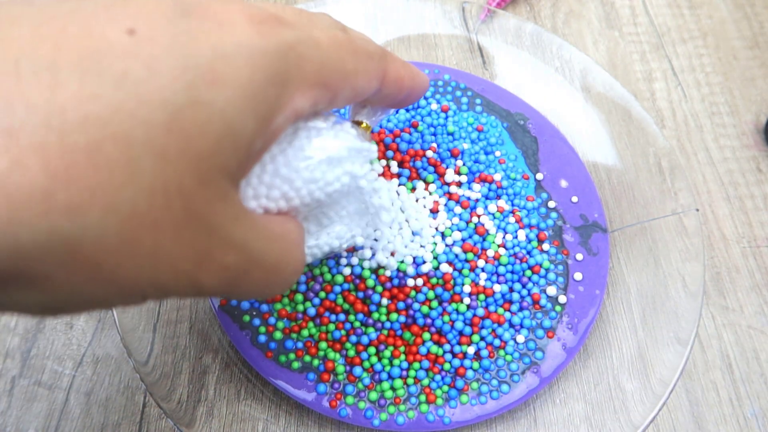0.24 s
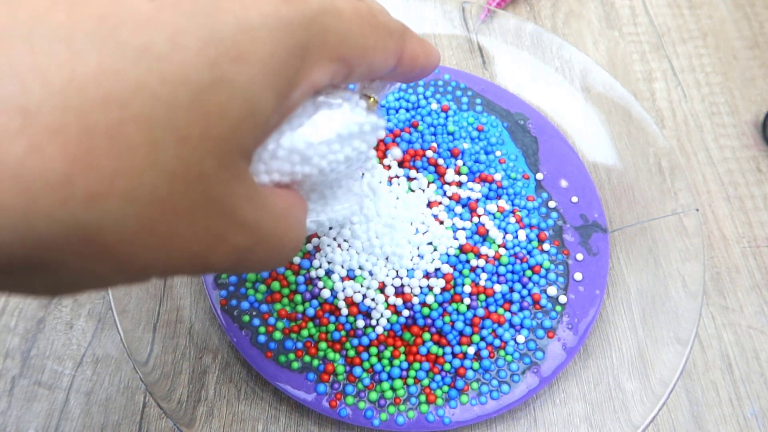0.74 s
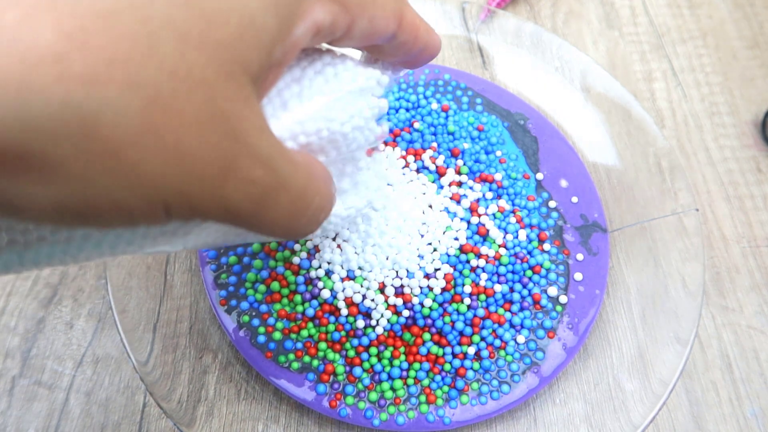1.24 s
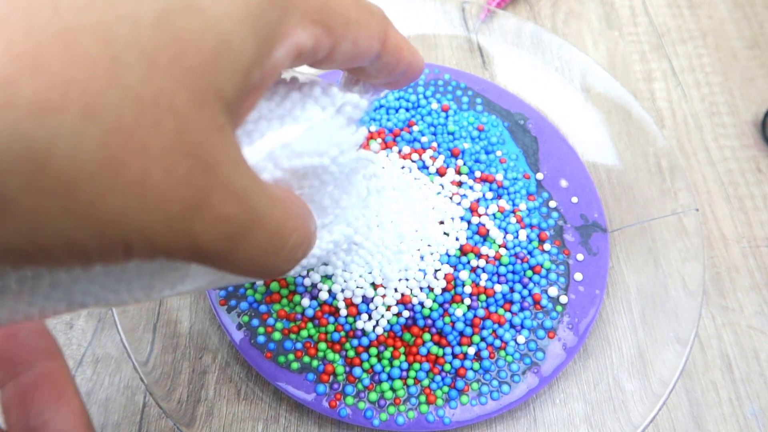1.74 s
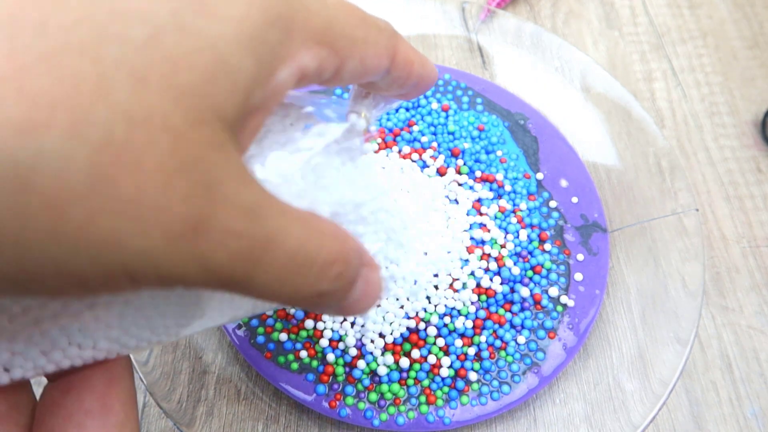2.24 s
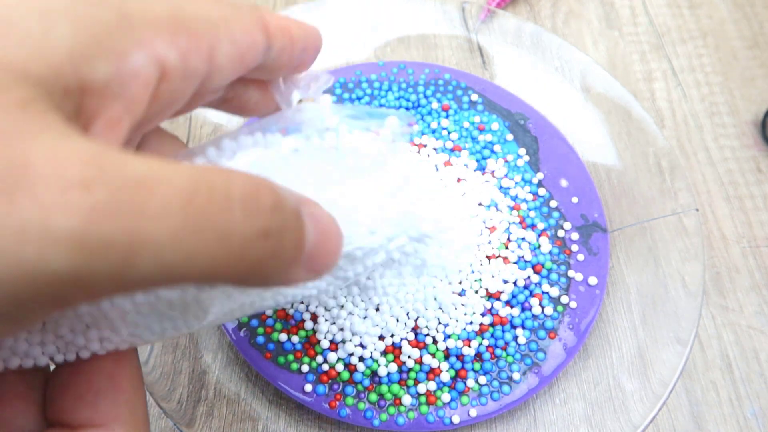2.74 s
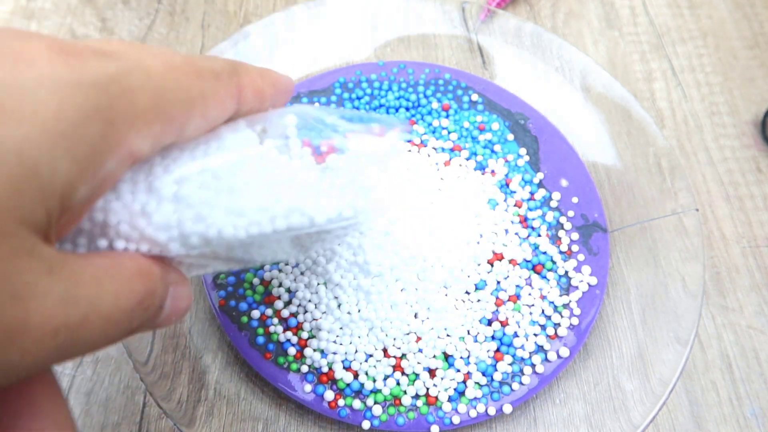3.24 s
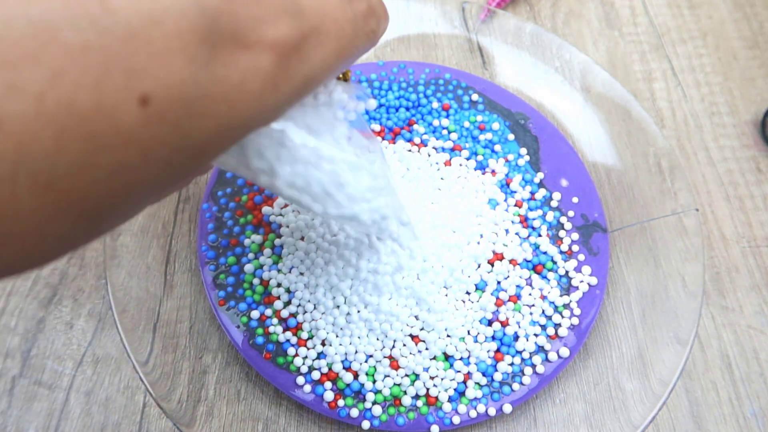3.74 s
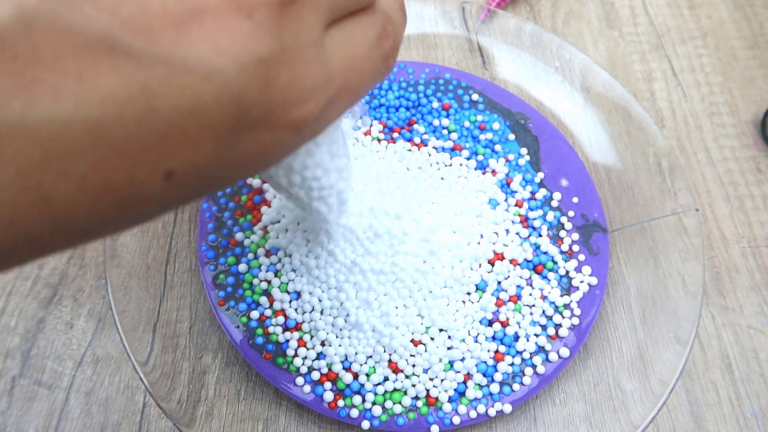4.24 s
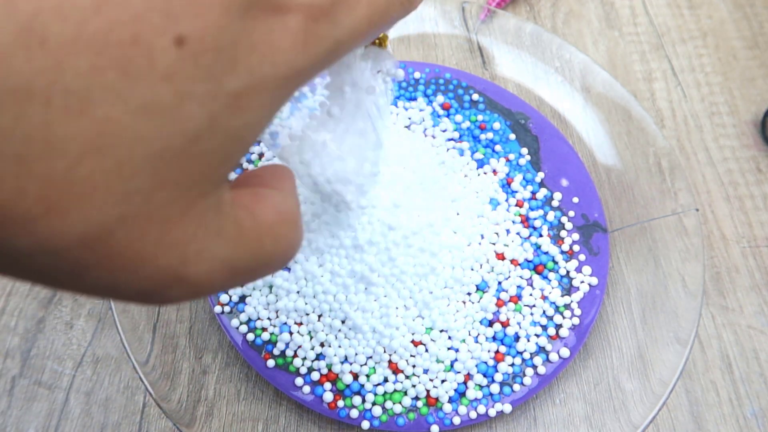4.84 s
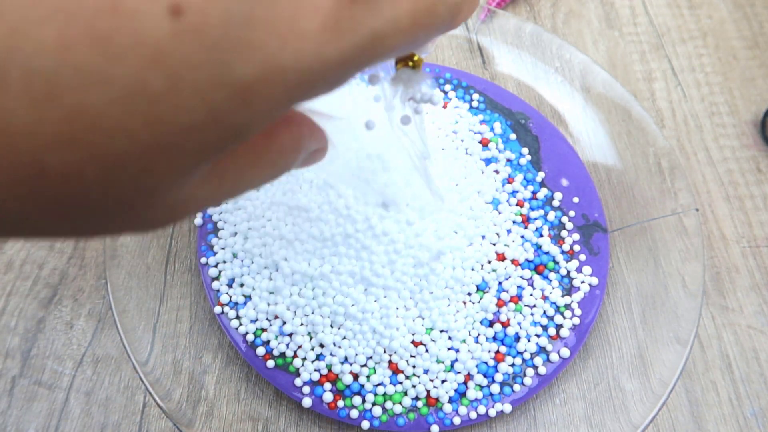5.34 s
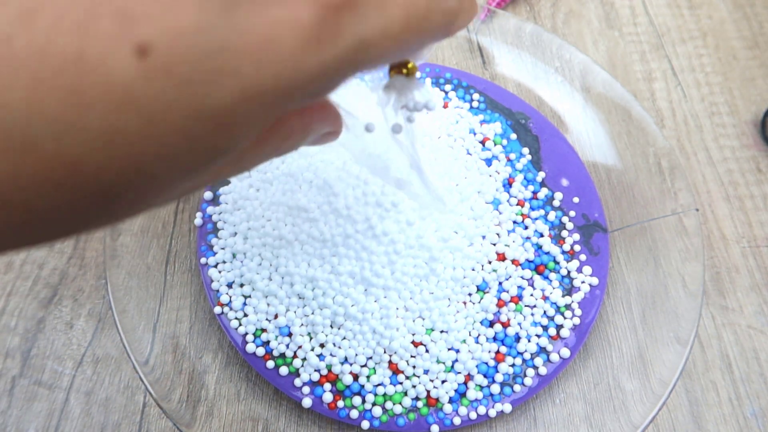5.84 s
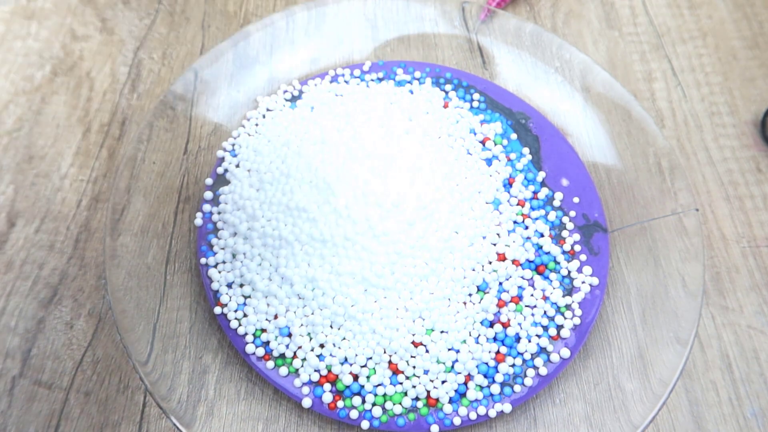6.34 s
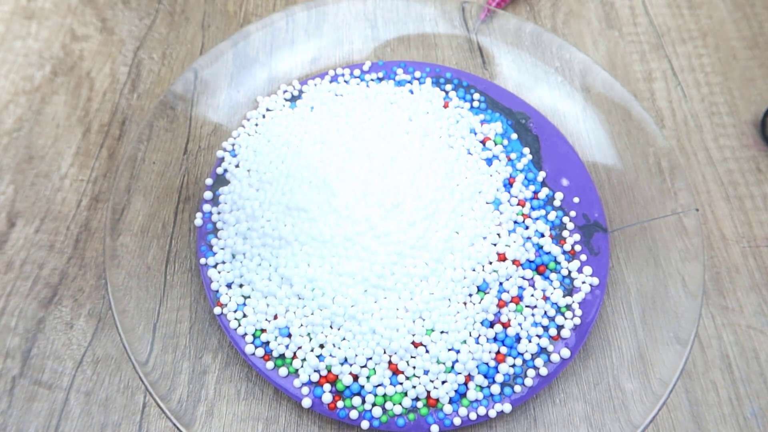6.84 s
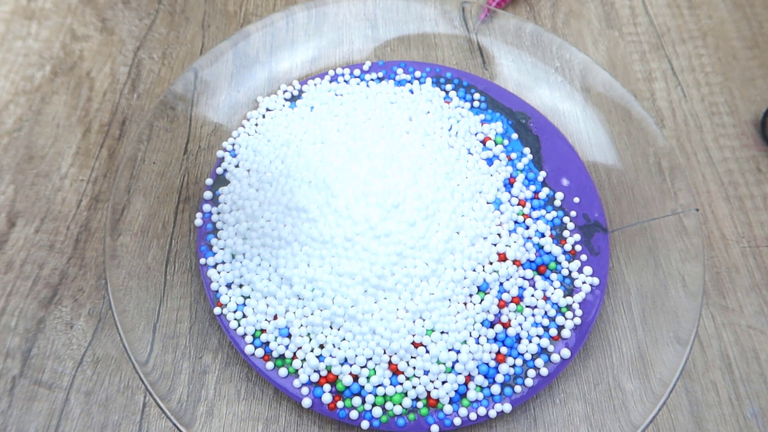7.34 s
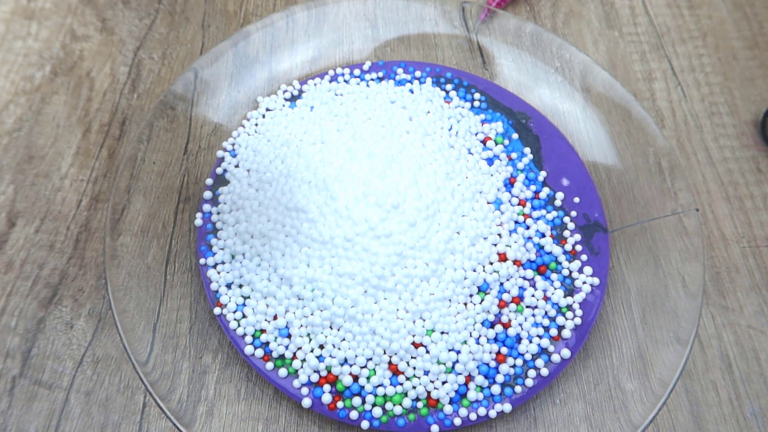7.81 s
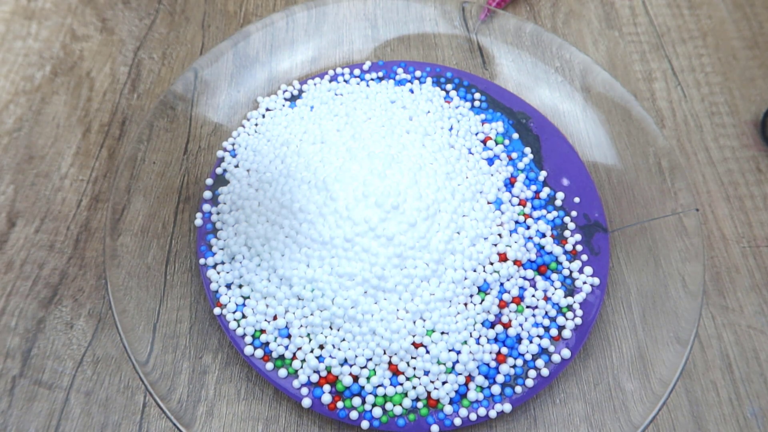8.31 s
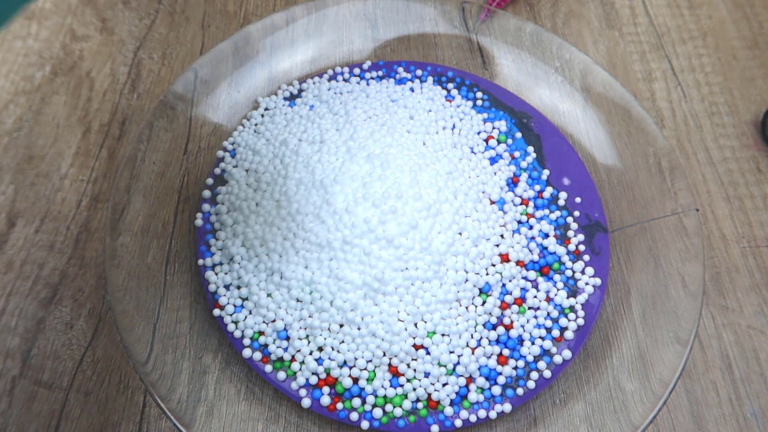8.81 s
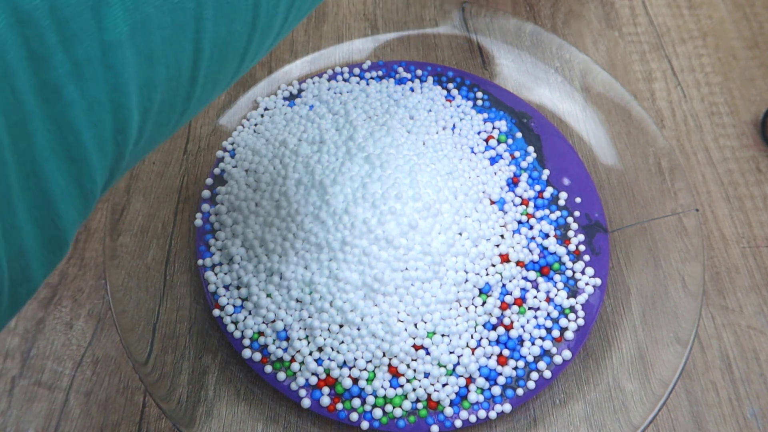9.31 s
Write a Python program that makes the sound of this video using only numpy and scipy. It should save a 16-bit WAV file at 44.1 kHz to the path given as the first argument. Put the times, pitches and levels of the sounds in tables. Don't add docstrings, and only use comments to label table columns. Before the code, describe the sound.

Thin plastic film rustles and pops close up after two distorted early thumps, fading into near-quiet before a stiffer bag crackles crisply at the end.

```python
import sys
import numpy as np
from scipy import signal
from scipy.fft import rfft, irfft, next_fast_len
from scipy.io import wavfile
from scipy.ndimage import uniform_filter1d

SR = 44100
rng = np.random.default_rng(int(sys.argv[2]) if len(sys.argv) > 2 else 0)


def level_to_linear(level):
    exponent = np.asarray(level, float) / 20
    return 10 ** exponent


def unload_wav(signal):
    wavfile.write(
        sys.argv[1],
        SR,
        np.round(np.clip(np.atleast_2d(signal).T, -1, 1) * 32767).astype(np.int16),
    )


N = 422037
T = np.arange(N) / SR
SLOW = T[::64]

# pitch_hz, level_db (per Hz)
FILM_TONE = [(180, -50), (300, -14), (366, -8.5), (725, -6), (1150, -8.5), (1360, -7), (1690, -4.5),
             (2400, -8), (4300, -4), (5340, -7.5), (6100, -14), (9880, -18.5), (15000, -35.5), (16000, -43)]
# pitch_hz, level_db (per Hz)
STIFF_TONE = [(2000, -30), (4000, -8), (5500, 0), (7000, -5), (10000, -9), (13000, -11), (15500, -15),
              (17000, -40)]
# pitch_hz, level_db (per Hz)
ROOM_TONE = [(15, -27.5), (25, 6), (58, 1.5), (146, -10.5), (313, -11.5), (422, -16), (854, -18.5),
             (1030, -19.5), (1250, -23), (1880, -29), (2460, -30), (12900, -34.5), (14400, -32),
             (15600, -33), (16500, -40)]
# pitch_hz, level_db, wander_hz
HUM = [
    (50, -60.5, 3.3),
    (100.7, -69, 7.65),
]
# start_s, peak_db, swing_hz, length_s, ring_share_db
BUMPS = [(.2120, -9, 240, .012, -14), (.2111, -15, 1000, .012, -30), (.2170, -11, 1150, .004, -30),
         (.2173, 3, 330, .0075, -36), (.2263, -12, 240, .015, -36), (.2981, -23, 250, .012, -30),
         (.3051, -1, 300, .0085, -18), (.3150, -11, 230, .010, -34), (.413, -31, 312, .04, -25),
         (.443, -22, 312, .035, -25), (.465, -23, 420, .035, -20), (.518, -35, 150, .04, -20),
         (.559, -25, 400, .04, -25), (.594, -26, 436, .03, -25), (3.383, -37, 140, .03, -40),
         (3.426, -38, 130, .03, -40), (5.660, -35, 90, .03, -40), (5.697, -32, 70, .04, -40),
         (6.919, -35, 150, .03, -40), (7.4825, -35, 150, .07, -6), (7.5292, -14, 300, .012, -12),
         (7.5328, -7.5, 290, .012, -9), (7.541, -19, 345, .06, -30), (7.609, -14, 380, .010, -12),
         (7.62, -33, 150, .06, -30), (7.640, -29, 400, .03, -12), (7.7375, -10, 320, .028, -13),
         (9.327, -34, 170, .03, -30), (2.337, -30, 390, .015, -30), (2.42, -36, 340, .015, -30),
         (3.097, -37, 310, .015, -30), (3.5105, -27, 650, .008, -30), (3.707, -34, 300, .01, -30),
         (3.784, -36, 200, .012, -30), (3.864, -31, 450, .01, -30), (3.918, -28, 380, .01, -30),
         (4.026, -34, 220, .012, -30), (4.269, -25, 420, .01, -30), (5.171, -34, 180, .015, -30),
         (5.399, -35, 350, .012, -30),]
# pitch_hz, level_db, fade_60db_s
STAND_MODES = [(146, -1, 0.069), (344, -4, 0.099), (492, 4, 0.045), (620, -4, 0.03), (880, 0, 0.04),
               (934, -14.5, 0.14), (1350, -10, .015), (2040, -6, 0.021), (6630, -12.5, 0.022)]
# peak_s, main_mode_db, judder_db, fall_10db_s
PUSHES = [
    (.41, -56, -34, .06),
    (.46, -52, -30, .07),
    (.59, -48, -36, .17),
    (.68, -44, -55, .03),
    (.89, -42, -48, .06),
    (.97, -43, -56, .05),
    (1.6, -52, -48, .3),
    (7.59, -41, -46, .04),
    (7.67, -43, -46, .04),
]
# start_s, jump (1 = full scale), chatter_ms before settling
SLAMS = [(.2089, -2.4, .4), (.2098, 3.3, .25), (.2108, -.6, .05), (.2774, 1.6, .4), (.2787, -1.7, .05),
         (.2796, .95, .05), (.2828, -.9, .05), (.2840, .9, .05), (.2868, -.75, .3), (.2872, .85, .03),
         (.2874, -.85, .03), (.2887, .95, .25), (.2890, -.9, .03), (.2192, .08, .03), (.3053, -.12, .03)]
# start_s, lowest_gain_db, hold_s
DUCKS = [
    (.209, -28, .001),
    (.277, -35, .04),
]
# start_s, rustle_db, treble_share_db
GRIP = [(0, -52, -12), (.06, -45, -17), (.2, -43, -13), (.55, -50, -11), (.93, -54, -8), (1.15, -47, -9),
        (1.85, -50, -5), (2.6, -46, -5), (3.45, -45, -12), (4.1, -44, -12), (4.9, -45, -8), (5.2, -51, -3),
        (5.45, -61, -9), (6.2, -63, -8), (7.5, -67, -8), (9.1, -66, -7), (9.3, -60, -12), (9.57, -46, -5)]
# peak_s, level_db, rise_10db_s, fall_10db_s, treble_share_db
POURING = [(.45, -39, .015, .065, -15), (.71, -47, .03, .1, -14), (.83, -45, .03, .04, -11),
           (1.03, -46, .06, .3, -14), (1.62, -46, .08, .08, -12), (1.78, -48, .4, .08, -12),
           (2.01, -38, .12, .1, -11), (2.25, -36, .08, .2, -15), (2.51, -34, .1, .06, -11.5),
           (2.7, -42, .08, .08, -12), (2.86, -39, .1, .11, -12.5), (3.12, -41, .2, .02, -13),
           (3.19, -40, .03, .15, -18), (3.28, -37, .1, .06, -8), (3.39, -37, .01, .04, -17),
           (3.8, -33, .1, .25, -13.5), (3.93, -33, .06, .06, -15), (4.28, -31.5, .08, .26, -13.5),
           (4.51, -29, .07, .09, -13), (4.75, -30.5, .08, .11, -11.5), (4.89, -38, .02, .03, -19),
           (4.97, -38, .07, .2, -14)]
# peak_s, level_db, rise_10db_s, fall_10db_s, treble_share_db
HANDLING = [(5.4, -48, .02, .02, -28), (5.66, -49, .04, .2, -16), (6.57, -48, .12, .2, -9),
            (6.8, -56, .1, .08, -3), (6.93, -43, .015, .1, -24), (7.02, -45, .06, .08, -8),
            (7.26, -45.5, .07, .07, -10), (8.07, -54, .008, .05, -20), (8.4, -58, .25, .15, -8),
            (8.58, -47, .006, .06, -34), (9.17, -44, .005, .05, -9), (9.215, -41, .01, .02, -14),
            (9.335, -34, .005, .03, -2.5), (9.39, -30.5, .03, .07, -4), (9.57, -38, .12, .1, -7)]
# start_s, peak_db, ring_hz, treble_share_db
PINGS = [(2.2044, -31, 1620, -26), (3.1672, -28, 1600, -21), (3.1983, -18, 1640, -13.5),
         (3.2354, -24, 1750, -17), (3.384, -16.5, 1440, -14), (3.4266, -19.5, 1740, -30),
         (3.9185, -12.5, 1600, -18.5), (3.9304, -15, 2140, -28), (3.9554, -22, 1680, -16),
         (4.0273, -17, 1690, -40), (4.0846, -23.5, 1570, -19), (4.5078, -9.5, 1760, -14.5),
         (4.5714, -18.5, 1440, -30), (4.58, -14.5, 1600, -30), (4.6678, -29, 1550, -27),
         (4.8831, -16.5, 1280, -30), (5.0614, -23, 1540, -28), (5.2978, -35, 1470, -30),
         (5.62, -24, 1580, -58), (5.8601, -34, 1830, -8), (6.2861, -39, 1860, -28),
         (7.0663, -33, 1040, -22), (7.2592, -22, 1480, -13), (7.3063, -23.5, 1520, -16)]
# start_s, peak_db, ring_hz, treble_share_db
SNAPS = [(.6973, -34, 4250, -20), (.826, -21, 4450, -12), (1.9749, -26, 4250, -13),
         (2.0213, -25, 3850, -20), (2.4194, -23.5, 4340, -24), (2.4877, -14, 3500, -16.5),
         (3.0011, -28, 2780, -25), (3.2675, -14, 4500, -19), (3.3194, -28, 4790, -4),
         (3.7843, -15, 3430, -19), (3.7904, -20, 3350, -18), (3.8654, -20, 4130, -21),
         (4.5334, -19, 3640, -30), (4.6838, -25.5, 3960, -33), (4.7306, -31, 4050, -29),
         (5.1352, -37, 3660, -4), (5.1711, -12, 3750, -20), (5.4745, -37, 4700, -30),
         (5.8414, -38, 5500, -10), (5.8187, -23, 5700, -15.5), (6.7765, -41, 4450, -9),
         (7.1471, -33, 3870, -19), (7.195, -35, 3320, -14)]
# start_s, peak_db, ring_hz, treble_share_db
THUDS = [(.5711, -36.5, 1520, -22), (.9278, -40, 1450, -11), (2.3376, -25, 1270, -17),
         (3.512, -22, 1770, -30), (3.5765, -31, 900, -40), (4.2684, -23, 1730, -26),
         (4.2737, -33, 1780, -27), (5.2245, -34, 1420, -20), (5.3996, -28, 1290, -50),
         (5.4717, -31.5, 1450, -18), (5.5123, -40, 3590, -17), (5.7643, -39, 1510, -25),
         (5.9209, -38, 1600, -23), (6.8897, -34, 1020, -47), (6.9206, -25, 1000, -25),
         (6.9655, -35, 3240, -19)]
# start_s, peak_db, ring_hz, treble_share_db
NEXT_BAG = [
    (8.1972, -42.5, 2130, .5),
    (8.4271, -40.5, 3040, -2.5),
    (9.166, -28, 1840, -9.5),
    (9.4044, -18, 1640, -20),
    (9.4987, -27.5, 4530, -19),
    (9.5192, -30, 1740, -17),
    (9.5486, -25.5, 1840, -11),
]
# body_share_db, tail_ms
CREASE_KINDS = [
    (-26, 5.3),
    (-25, 5.5),
    (-12, 5.5),
    (-23, 9.5),
]
# start_s, peak_db, length_ms, centre_hz, treble_share_db
RUNS = [(.074, -30, 4, 1700, -20), (.14, -33, 25, 1400, -20), (.177, -31, 8, 1700, -14),
        (2.2366, -27, 8, 4380, -18), (2.2485, -25, 8, 4400, -18), (2.4556, -31, 8, 3600, -10),
        (2.5668, -27, 6, 4580, -15), (3.0981, -20, 12, 4300, -18), (3.281, -21, 8, 4400, -14),
        (3.512, -22, 3, 4100, -22), (3.5591, -36, 5, 2300, -11), (3.6547, -36, 6, 1570, -17),
        (3.6782, -33, 6, 2550, -15), (4.2479, -23, 8, 4280, -18), (4.2737, -15, 5, 1900, -15),
        (4.38, -22, 15, 3600, -18), (4.487, -25, 8, 4300, -22), (5.0056, -32, 6, 1270, -15),
        (5.36, -33, 8, 4000, -15), (5.3996, -37, 5, 2100, -30), (6.921, -20, 5, 900, -17),
        (6.934, -26, 14, 700, -25), (6.982, -28, 8, 3600, -12), (7.0149, -29, 10, 3900, -13),
        (7.0324, -27, 9, 4300, -15), (7.0833, -33, 5, 4300, -10), (7.1531, -32, 3, 4270, -22),
        (7.2, -36, 4, 3300, -10), (7.2345, -28, 6, 1200, -14), (8.0626, -38, 14, 3200, -16),
        (8.5739, -28, 8, 2200, -25), (8.585, -32, 25, 500, -30), (9.1885, -25, 10, 4900, -8),
        (9.2109, -21, 8, 1700, -9), (9.238, -36, 8, 5000, -10), (9.2733, -36, 8, 5000, -10),
        (9.327, -24, 6, 1500, -8), (9.331, -16, 14, 5600, -8), (9.44, -30, 6, 4500, -8),
        (9.529, -36, 3, 1800, 3),
        (2.489, -23, 18, 4600, -12), (3.385, -22, 5, 3800, -12), (3.427, -26, 4, 3000, -18),
             (9.211, -25, 6, 5500, -3), (3.7845, -22, 5, 4200, -14), (.306, 8, 3, 1200, -30),
             (9.415, -20, 8, 5500, -8), (9.365, -24, 10, 5800, -8), (3.785, -20, 6, 1700, -20),
             (3.919, -19, 4, 2600, -20), (4.027, -27, 3, 3500, -25), (4.58, -22, 3, 4100, -22),
             (4.884, -25, 5, 3700, -22), (5.172, -24, 3, 5200, -6), (7.2355, -31, 6, 4300, -14),
             (7.26, -27, 6, 1500, -14)]


def unit(x):
    return x / np.sqrt(np.mean(x ** 2))


def peak(x):
    return x / np.abs(x).max()


def colour(x, points, lo_hz=8.4, hi_hz=30300.0):
    size = next_fast_len(len(x))
    hz = np.maximum(np.fft.rfftfreq(size, 1 / SR), 1)
    points_hz, points_db = np.array(points).T
    db = np.interp(np.log(hz), np.log(points_hz), points_db)
    skirts = 1 / np.sqrt((1 + (lo_hz / hz) ** 8) * (1 + (hz / hi_hz) ** 8))
    return irfft(rfft(x, size) * level_to_linear(db) * skirts, size)[:len(x)]


def walk(rate_hz):
    k = int(SR / rate_hz)
    steps = np.repeat(rng.standard_normal(N // k + 1), k)
    return unit(uniform_filter1d(uniform_filter1d(steps, k), k)[:N])


def ring(x, hz, t60):
    p, w = np.exp(-np.log(1000) / (t60 * SR)), 2 * np.pi * hz / SR
    return signal.lfilter([0, p * np.sin(w)], [1, -2 * p * np.cos(w), p * p], x)


def add(out, s, x):
    i = int(s * SR)
    out[i:i + len(x)] += x[:len(out) - i]


def swell(s, peak_s, rise_s, fall_s):
    roundness = 1.5
    return -10 * np.where(s < peak_s, (peak_s - s) / rise_s, (s - peak_s) / fall_s) ** roundness


def room():
    out = level_to_linear(-59 + .5 * walk(3.28)) * unit(colour(rng.standard_normal(N), ROOM_TONE, 95., 19000.0))
    out += level_to_linear(-74.) * unit(colour(rng.standard_normal(N), ROOM_TONE, 28., 45.))
    out += level_to_linear(-80.) * unit(ring(rng.standard_normal(N), 14850., .012))
    for hz, db, wander_hz in HUM:
        turns = np.cumsum(hz + wander_hz * walk(25)) / SR
        out += np.sqrt(2) * level_to_linear(db + 1.2 * walk(9)) * np.sin(2 * np.pi * turns)
    return out


def gain_db(s):
    rest_db, attack_s, recover_db_per_s = 8.5, .009, 420.
    db = rest_db + 0 * s
    for start, low_db, hold in DUCKS:
        since = s - start - attack_s
        falling = -since / attack_s * (rest_db - low_db)
        recovering = np.maximum(since - hold, 0) * recover_db_per_s
        db = np.minimum(db, low_db + np.maximum(falling, recovering))
    return db


def bumps():
    out, blows, t = np.zeros(N), np.zeros(N), T[:SR // 4]
    for s, db, hz, t60, ring_db in BUMPS:
        size = level_to_linear(db - gain_db(s + 0.0023))
        build_up = (1 - np.exp(-hz * t / .45)) ** 2
        fade = np.exp(-np.log(1000) * (t / t60) ** 2)
        add(out, s, size * peak(-np.sin(2 * np.pi * hz * t) * build_up * fade))
        push = np.hanning(3 + int(17.0 / np.sqrt(size)))
        add(blows, s, -size * level_to_linear(ring_db) * push / push.sum())
    return out + sum(level_to_linear(db) * ring(blows, hz, t60) for hz, db, t60 in STAND_MODES)


def rocking():
    out, rest_db, rise_s = np.zeros(N), 8.5, .04
    turns = np.cumsum(352. + 6.5 * walk(18)) / SR
    mode = np.sqrt(2) * level_to_linear(1.4 * walk(24.4)) * np.sin(2 * np.pi * turns)
    low = ring(rng.standard_normal(N), 330.0, 0.025)
    high = ring(rng.standard_normal(N), 453.0, 0.021)
    judder = unit(low + high)
    for s, mode_db, judder_db, fall in PUSHES:
        mode_level = level_to_linear(mode_db - rest_db + swell(SLOW, s, rise_s, fall))
        judder_level = level_to_linear(judder_db - rest_db + swell(SLOW, s, rise_s, .6 * fall))
        out += mode * np.interp(T, SLOW, mode_level) + judder * np.interp(T, SLOW, judder_level)
    return out


def crackles():
    out, t = np.zeros(N), T[:2048]
    late = np.maximum(t - .004, 0)
    tables = (PINGS, SNAPS, THUDS, NEXT_BAG)
    pops = [(*row, *kind) for table, kind in zip(tables, CREASE_KINDS) for row in table]
    noise = rng.standard_normal((len(pops), 4, len(t)))
    for (s, db, hz, treble_db, body_db, tail_ms), chance in zip(pops, noise):
        ragged = level_to_linear(40. * uniform_filter1d(chance[3], size=90))
        click = np.exp(-late / 0.00024)
        tail = 0.022 * tail_ms * ragged * np.exp(-1000 * late / max(tail_ms, 1))
        snap = chance * (t > .004) * (click + tail)
        patch = peak(ring(snap[0], hz, .008))
        wide = peak(colour(snap[0], FILM_TONE, 1180.0, 6200.))
        top = peak(colour(snap[1], FILM_TONE, 7600.0, 11200.0))
        body = ring(ring(snap[2], 480.0, 0.006), 480., .004)
        body = peak(np.diff(body, prepend=0))
        share = np.clip(-treble_db / 66.0, 0, 1)
        snapped = share * patch + (1 - share) * wide + level_to_linear(treble_db + 3.5) * top + level_to_linear(body_db + 1.0) * body
        add(out, s - .004, level_to_linear(db - 4.5) * np.clip((t - .0034) / .0005, 0, 1) * snapped)
    return out


def runs():
    out, t = np.zeros(N), T[:4096]
    late = np.maximum(t - .004, 0)
    events = RUNS
    noise = rng.standard_normal((len(events), 4, len(t)))
    for (s, db, ms, hz, treble_db), chance in zip(events, noise):
        ragged = level_to_linear(35. * uniform_filter1d(chance[3], size=60))
        folds = chance * ragged * (1 - np.exp(-late / .0006)) * np.exp(-1000 * late / max(ms, 1))
        patch = peak(colour(folds[0], FILM_TONE, hz / 1.4, hz * 1.4))
        wide = peak(colour(folds[1], FILM_TONE, 900., 6200.))
        top = peak(colour(folds[2], FILM_TONE, 6200., 14000.))
        run = patch + .35 * wide + level_to_linear(treble_db + 3) * top
        add(out, s - .004, level_to_linear(db - 10) * np.clip((t - .0035) / .0006, 0, 1) * run)
    return out


def kneading():
    s, *columns = np.transpose(GRIP)
    grip_db, grip_treble_db = (np.interp(SLOW, s, c) for c in columns)
    at, db, rise, fall, treble_db = np.transpose(POURING + HANDLING)[:, :, None]
    grip, squeezes = level_to_linear(2 * grip_db), level_to_linear(2 * (db + swell(SLOW, at, rise, fall)))
    power = grip + squeezes.sum(axis=0)
    mixed_db = (grip * grip_treble_db + (squeezes * treble_db).sum(axis=0)) / power
    return np.interp(T, SLOW, 10 * np.log10(power)), np.interp(T, SLOW, mixed_db)


def creases(per_s, spread_db, smear_ms):
    sizes = level_to_linear(spread_db * np.minimum(rng.exponential(size=N), 4.5))
    folds = (rng.random(N) < per_s / SR) * sizes
    fade = np.exp(-1000 / (smear_ms * SR))
    return np.sqrt(signal.lfilter([1], [1, -fade], folds ** 2)) * rng.standard_normal(N)


def rustle():
    db, treble_db = kneading()
    shared = unit(creases(per_s=900., spread_db=2.6, smear_ms=2.0))
    dull_db = -.3 * (treble_db + 10.5)
    ranges = ((300., 860.0, dull_db - 18), (966.0, 2000.0, dull_db - 10.5), (1560.0, 1620.0, -12.0),
              (2450.0, 5600.0, -4.7 - dull_db), (5880.0, 16000.0, treble_db - 1.2))
    out = 0
    for lo, hi, share_db in ranges:
        own = unit(creases(per_s=1500., spread_db=3.2, smear_ms=.7))
        band = unit(colour(shared + 1.8 * own, FILM_TONE, lo, hi))
        out = out + level_to_linear(share_db + 0.23 * walk(25)) * band
    stiff = unit(colour(creases(per_s=1200., spread_db=3.0, smear_ms=.8), STIFF_TONE))
    out = np.where(T > 9.1, level_to_linear(-2.5) * out + level_to_linear(-6.) * stiff, out)
    return level_to_linear(db - 7.2 + 1.3 * walk(20)) * out


def scene():
    bag = rustle() + crackles() + runs()
    t = T[:SR // 4]
    tail = rng.standard_normal(len(t)) * np.exp(-np.log(1000) * t / 0.04)
    echo = level_to_linear(-43) * signal.fftconvolve(bag, tail)[:N]
    return (bag + echo + bumps() + rocking() + room())[None]


def overload():
    rails, fizz = np.zeros(N), rng.standard_normal(N)
    for s, jump, chatter_ms in SLAMS:
        i, k = int(s * SR), int(chatter_ms * SR / 1000)
        rails[i:] += jump
        before = T[k:0:-1]
        wobble = np.sin(2 * np.pi * 5300. * before)
        wobble = wobble + (s > .25) * np.sin(2 * np.pi * 13500. * before)
        rails[i - k:i] += jump * np.where(wobble < 0, .7, -.05)
        add(rails, s, 0.02 * fizz[i:i + 256] * np.exp(-T[:256] / 0.0004))
    drain = signal.butter(2, 72., "high", fs=SR, output="sos")
    return signal.sosfilt(drain, uniform_filter1d(rails, size=2))


def roll_off(x):
    return signal.sosfilt(signal.butter(12, 16820, fs=SR, output="sos"), x)


def record(dry):
    heard = signal.sosfilt(signal.ellip(10, .3, 70, 15600., fs=SR, output="sos"), dry)
    clipped = np.clip(heard * level_to_linear(gain_db(T)) + overload(), -1, 1)
    mix = signal.sosfilt(signal.ellip(6, .2, 50, 16800., fs=SR, output="sos"), clipped)
    return roll_off(mix)


dry = scene()
out = record(dry)
unload_wav(out)
```